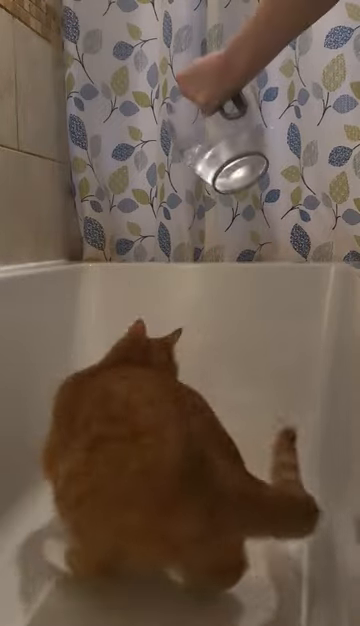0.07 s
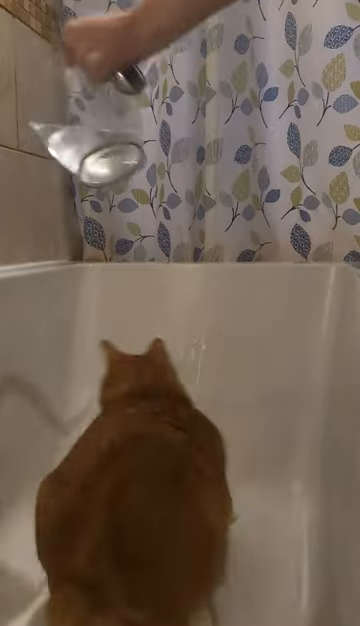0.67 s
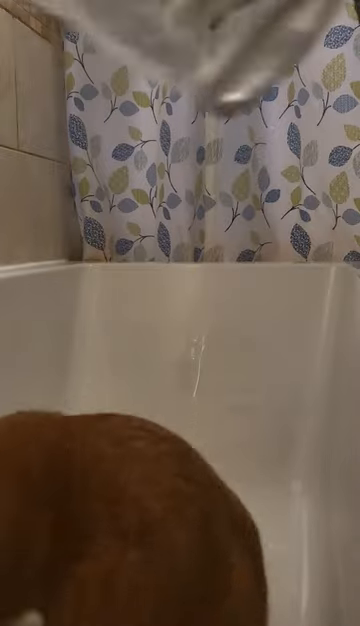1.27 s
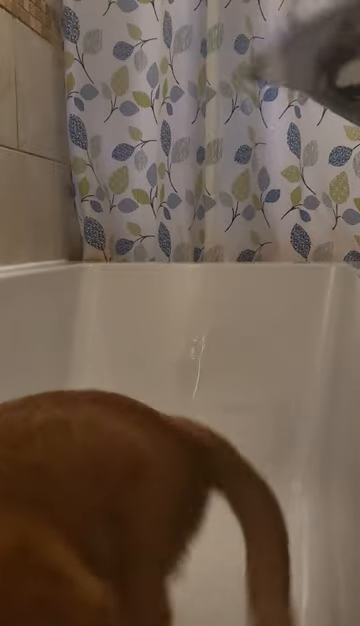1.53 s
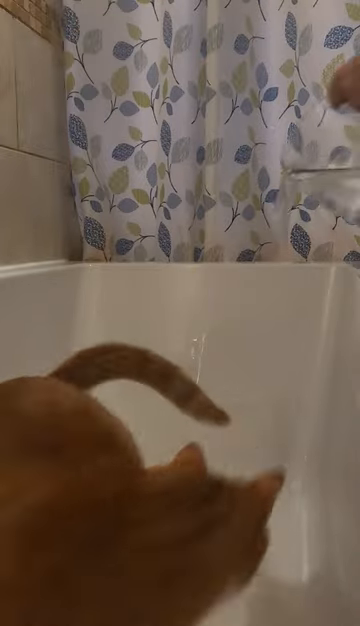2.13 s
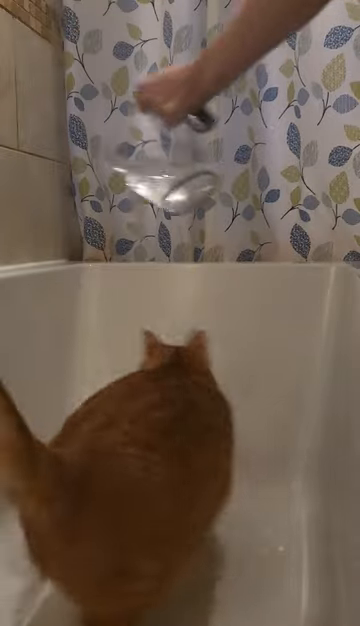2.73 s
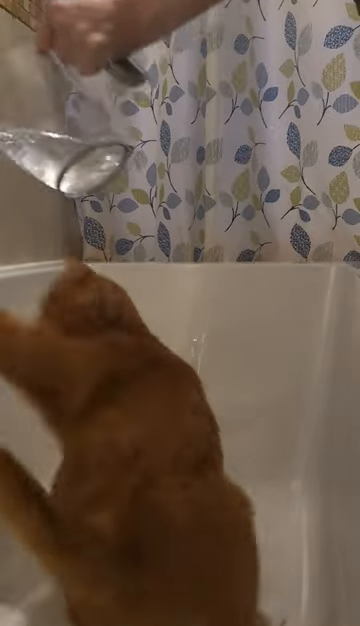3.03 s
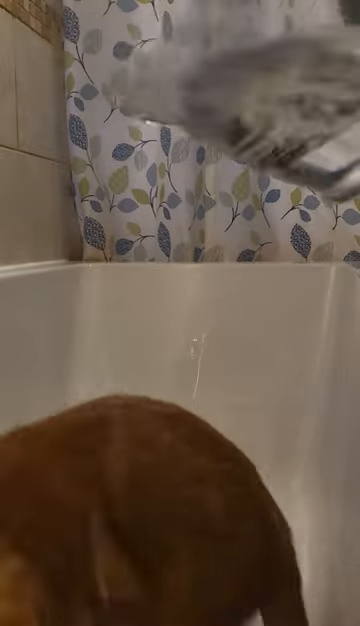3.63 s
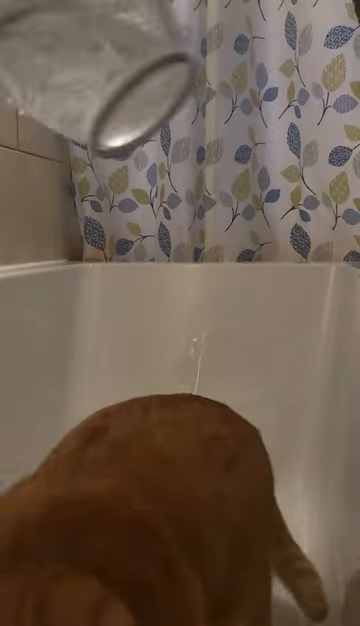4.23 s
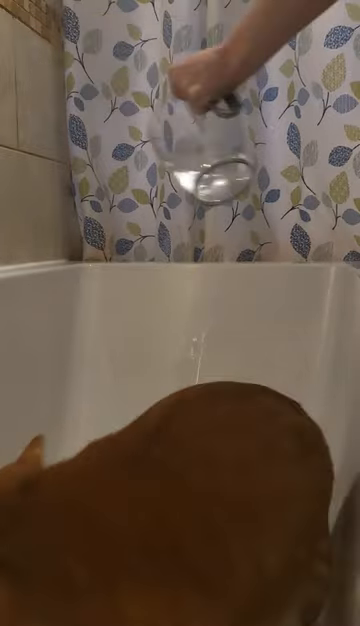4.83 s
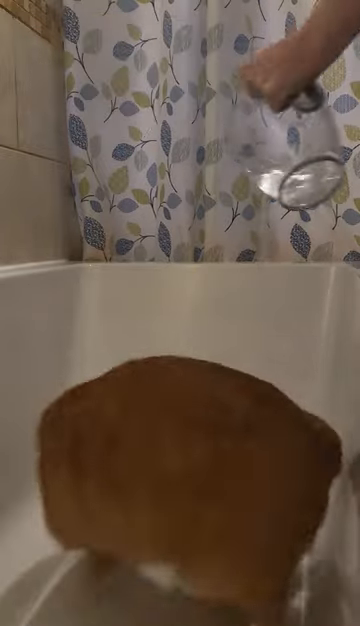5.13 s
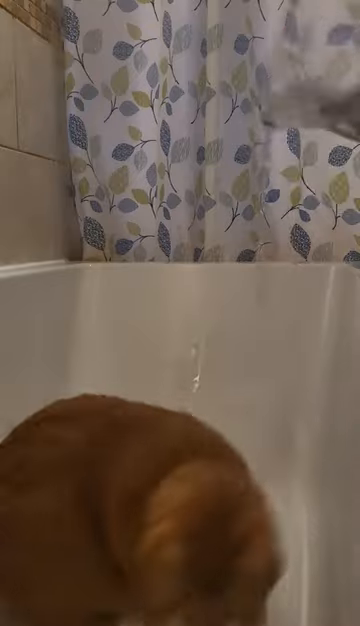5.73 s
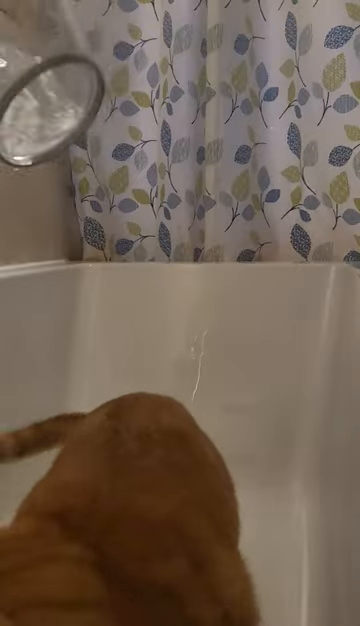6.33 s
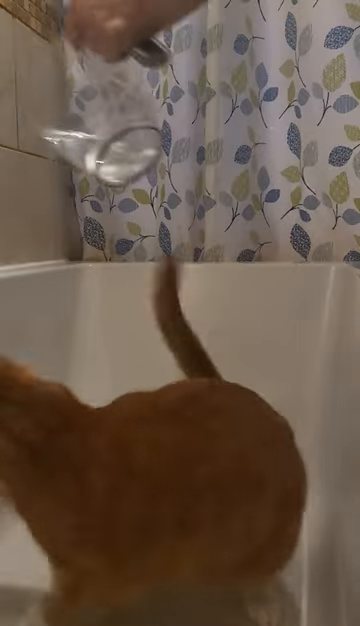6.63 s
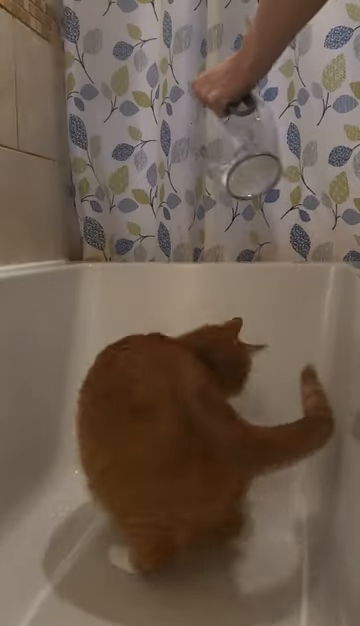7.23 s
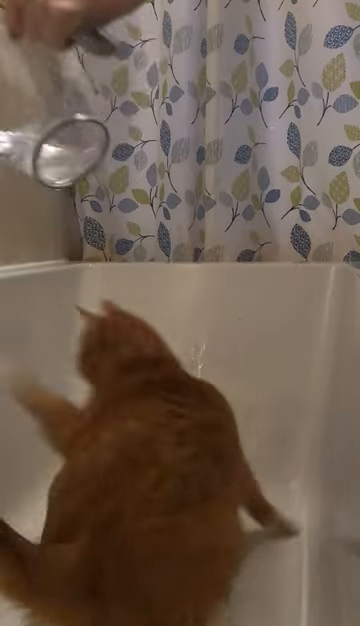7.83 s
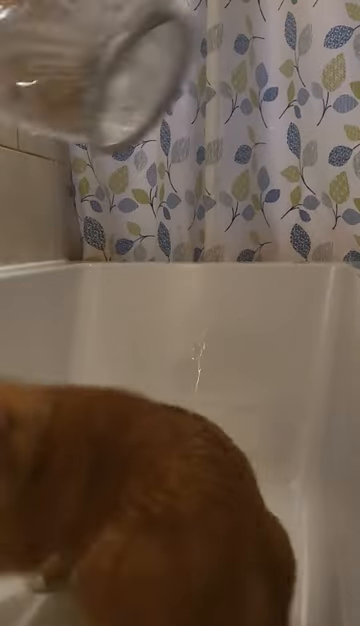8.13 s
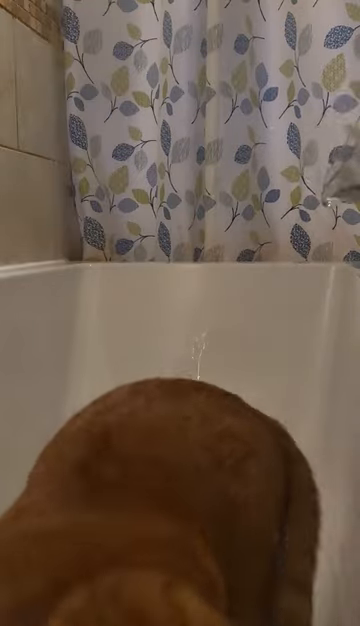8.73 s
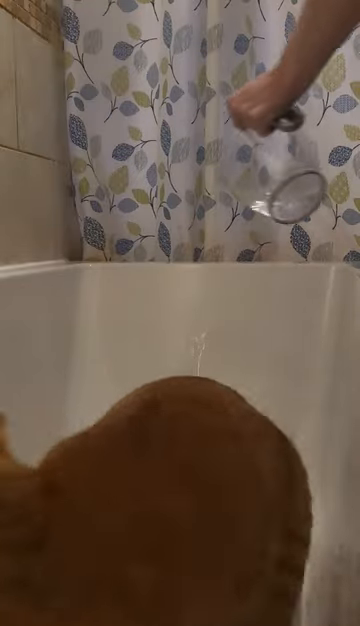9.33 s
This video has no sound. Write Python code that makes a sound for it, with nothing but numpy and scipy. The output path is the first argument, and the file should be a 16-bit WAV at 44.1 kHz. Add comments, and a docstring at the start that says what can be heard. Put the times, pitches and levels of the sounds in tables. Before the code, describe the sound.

A cat's paws thump and slap in a hollow bathtub while water splashes and drips in short bursts.

```python
"""A cat turns about in an empty bathtub and swats at a glass jug that is swung around it.
Its paws slap, thump and shuffle on the hollow tub, which rings and booms; a wet pad squeaks.
As the jug swings, water splashes (many tiny ringing bubbles) and drips (single splats and plinks).
Claws and flung water tick on the enamel, and the small tiled bathroom rings briefly."""
import sys
import numpy as np
from scipy import signal
from scipy.fft import rfft, irfft, next_fast_len
from scipy.io import wavfile
from scipy.ndimage import map_coordinates

SR = 44100
rng = np.random.default_rng(int(sys.argv[2]) if len(sys.argv) > 2 else 0)


def materialize(psi):
    """Save the field psi as 16-bit PCM at rate SR to the path in sys.argv[1].

    A 1-D psi becomes a single channel; in a 2-D psi each row is a channel.
    """
    bounded = np.clip(np.atleast_2d(psi).T, -1, 1)
    quanta = np.round(bounded * 32767).astype(np.int16)
    wavfile.write(sys.argv[1], SR, quanta)


N = 418509
T = np.arange(SR // 2) / SR  # the life of one short sound [s]

# Levels are relative, before later gains. A ring time (t60) is the time taken to fade by 60 dB.
# the tone of the quiet room (frequency [Hz], level [dB])
HUSH_TONE = [(20, -12), (64, -5), (130, -12.5), (300, -20.5), (1000, -34.5), (1600, -39.5), (4000, -46),
             (10000, -40), (16000, -53.5)]
# the rise and fall of a faint hollow noise (time [s], level [dB])
WASH_LEVELS = [(1.7, -82.5), (2.8, -69), (4.3, -80.5), (9, -90.5)]
# the cat shifts its feet (start [s], length [s], rumble level [dB], flexing level [dB])
FOOT_SHIFTS = [(0.01, 0.21, -28, -25.5), (0.633, 0.11, -49.5, -39), (0.765, 0.085, -35, -57.5),
               (0.967, 0.32, -32.5, -32.5), (1.328, 0.29, -36.5, -35.5), (1.804, 0.42, -60, -57.5),
               (2.17, 0.081, -44, -41), (2.355, 0.23, -32.5, -41), (2.478, 0.1, -32, -33),
               (2.685, 0.029, -41.5, -33.5), (2.896, 0.29, -34, -34), (3.34, 0.29, -29, -25),
               (3.711, 0.059, -32.5, -35.5), (4.432, 0.26, -49.5, -59), (4.745, 0.051, -41.5, -63),
               (4.888, 0.11, -31.5, -32), (5.073, 0.099, -35.5, -33.5), (5.341, 0.27, -33.5, -41),
               (5.469, 0.42, -34, -28.5), (5.884, 0.12, -41, -45), (6.084, 0.035, -36, -29.5),
               (6.375, 0.085, -35.5, -39.5), (6.572, 0.15, -38, -34.5), (6.856, 0.24, -29, -31.5),
               (7.24, 0.087, -36.5, -34), (7.669, 0.2, -54.5, -55.5), (7.815, 0.34, -33.5, -50.5),
               (8.092, 0.025, -21, -18), (8.28, 0.23, -35.5, -33.5), (8.636, 0.03, -34.5, -33),
               (9.199, 0.027, -47, -63), (9.298, 0.18, -38.5, -50)]
# the tone of the tub flexing (frequency [Hz], level [dB])
FLEX_TONE = [(22, -40), (40, -32.5), (52, -8.5), (63, 1.5), (76, -8), (100, -15.5), (600, -120)]
# the tone of soft paws on the tub (frequency [Hz], level [dB])
PAW_TONE = [(40, -39), (95, 3), (160, 4.5), (280, -2.5), (400, -7.5), (700, -14), (1100, -22), (8000, -100)]
# the notes at which the tub rings (pitch [Hz], level [dB], ring time [s])
TUB_NOTES = [(98.7, 5, 0.17), (116.6, 2, 0.31), (156.1, 0, 0.36), (189, -7, 0.31), (208.6, -0.5, 0.3),
             (256, -5.5, .26), (278.8, 3, 0.26), (328.4, -16.5, 1), (357.4, -3, 0.29), (394.3, -2.5, 0.09),
             (450, -2, 0.24), (518, -3, 0.18), (638, -6, 0.18), (857, -7.5, 0.4), (943, -9, 0.16),
             (1190, -15, 0.13)]
# water is thrown about (start [s], length [s], spray level [dB], slosh level [dB])
WATER_THROWS = [(.01, 0.099, -48.5, -46.5), (0.194, 0.055, -68, -59), (0.697, .04, -64, -87),
                (0.762, 0.081, -56.5, -54), (0.983, 0.05, -60, -52), (1.13, 0.049, -54.5, -47),
                (1.254, 0.14, -46, -48), (1.404, .17, -58.5, -53.5), (1.998, 0.28, -67.5, -75),
                (2.345, 0.074, -53.5, -54), (2.406, .04, -44, -49), (2.473, 0.037, -57.5, -50.5),
                (2.542, 0.21, -68, -73.5), (2.962, .16, -56, -53), (3.221, 0.07, -59.5, -64.5),
                (3.329, 0.026, -56, -45.5), (3.479, 0.17, -47, -52), (3.538, 0.019, -43, -39),
                (3.661, 0.13, -50, -52), (3.828, 0.044, -63, -70.5), (4.47, 0.15, -59.5, -66),
                (4.854, 0.07, -57, -56.5), (5.03, 0.25, -66, -69), (5.383, 0.066, -59, -57.5),
                (5.452, 0.04, -43, -41.5), (5.56, 0.15, -54, -48.5), (5.83, 0.085, -63, -58.5),
                (5.937, 0.012, -48, -48.5), (6.051, .1, -67.5, -59), (6.376, 0.13, -63.5, -58),
                (6.571, 0.18, -59, -54.5), (6.872, 0.11, -49.5, -46), (7.207, 0.08, -60, -53.5),
                (7.77, 0.022, -61, -62.5), (7.823, 0.077, -64.5, -58.5), (7.958, 0.24, -68.5, -55.5),
                (8.222, 0.059, -55.5, -55), (8.307, 0.04, -48, -45.5), (8.433, 0.08, -47.5, -47),
                (8.574, 0.023, -50.5, -51), (9.258, 0.14, -58, -60)]
# the tone of fine spray (frequency [Hz], level [dB])
SPRAY_TONE = [(1500, -39.5), (4000, -10.5), (6500, -2), (8000, -2), (10000, 6.5), (13000, 4.5),
              (16000, 3.5)]
# the tone of coarse sloshing (frequency [Hz], level [dB])
SLOSH_TONE = [(200, 9), (800, 5.5), (1300, 0.5), (2200, -2.5), (4200, -4.5), (12000, -35.5)]
# paws land on the tub floor (time [s], level [dB], centre pitch [Hz])
PAW_LANDINGS = [(.014, -20.5, 205), (0.052, -24, 265), (0.125, -17, 161), (0.156, -26, 277),
                (0.623, -42, 208), (0.794, -30, 217), (0.91, -11, 162), (1.102, -10.5, 264),
                (1.341, -32.5, 347), (2.181, -28, 136), (2.412, -28.5, 278), (2.491, -22.5, 170),
                (2.893, -41.5, 261), (2.962, -32.5, 177), (3.096, -12, 217), (3.297, -16.5, 266.4),
                (3.376, -15, 150), (3.549, -17, 152), (4.456, -40, 166), (4.867, -24.5, 282),
                (4.927, -25, 197.7), (5.533, -14.5, 169), (5.584, -19, 250), (5.674, -18.5, 210),
                (5.722, -10, 124), (5.738, -9.5, 205), (6.075, -29, 202), (6.379, -36.5, 206),
                (6.592, -37, 257), (6.648, -17.5, 390), (6.688, -11.5, 163), (6.87, -24, 345),
                (7.032, -9, 231), (7.041, -12, 108.8), (7.941, -14, 263), (8.098, -9, 197.7),
                (8.108, -6.5, 110.8), (8.648, -32, 146)]
# claws and flung water hit the enamel (time [s], level [dB])
ENAMEL_TICKS = [(.0503, -29), (0.1164, -34), (.1396, -32), (.2503, -46.5), (0.8344, -41), (1.0026, -39.5),
                (1.0783, -39), (1.6681, -48.5), (2.18, -39.5), (2.374, -37), (2.6923, -41.5), (3.046, -28),
                (3.3598, -26.5), (3.448, -36), (3.5052, -28), (4.4652, -45.5), (4.864, -29), (5.466, -27),
                (5.681, -23.5), (5.8417, -47), (6.4692, -45), (7.2667, -35), (7.441, -47.5), (8.3229, -28),
                (9.2843, -44), (9.392, -40)]
# the cat's weight flexes the whole tub (time [s], level [dB], pitch [Hz])
TUB_BOOMS = [(0.099, -38, 62.9), (0.992, -24, 63.1), (1.087, -25, 66.4), (3.362, -13, 66.7),
             (3.512, -23.5, 65.2), (5.709, -19.5, 62.6), (6.667, -19.5, 62.2), (7.044, -11.5, 62.8),
             (7.936, -29.5, 66.4), (8.079, -17, 57.7)]
# single drops land (time [s], level [dB], pitch [Hz], clearness of the ring [Q])
WATER_DROPS = [(0.416, -43, 6170, 1.9), (1.5319, -37.5, 7340, 6), (1.5785, -43.5, 2910, 7.8),
               (2.364, -31.5, 3650, 4.3), (2.3966, -28, 7650, 2.6), (2.451, -32.5, 4000, 5.4),
               (3.5682, -26, 6790, 2.8), (3.6334, -41, 2760, 8.1), (3.699, -32.5, 3320, 2.4),
               (3.7505, -30.5, 4700, 2.2), (3.7918, -41, 4000, 4.8), (3.8762, -36.5, 5600, 1.6),
               (4.213, -69, 3400, 10), (4.504, -39, 8550, 3.6), (4.5561, -37, 9330, 2.5),
               (4.615, -30, 3510, 2.3), (4.814, -42.5, 4180, 4), (5.146, -37.5, 2330, 3),
               (5.152, -30, 4400, 2), (5.4437, -35.5, 7000, 3), (5.515, -27.5, 3790, 3.1),
               (5.588, -24.5, 6700, 1.3), (5.9234, -40, 6250, 3.3), (5.9715, -27.5, 7040, 2.9),
               (6.068, -38.5, 4100, 1.6), (6.6822, -24, 3430, 1.4), (6.882, -28, 7050, 2.8),
               (6.9069, -22, 2490, 4.3), (6.919, -27.5, 3560, 3.4), (6.978, -32, 2946, 2),
               (7.0325, -25, 4310, 3), (7.037, -23, 6880, 2.7), (7.8485, -33.5, 10600, 2.4),
               (8.2411, -39.5, 10290, 4.4), (8.2711, -34.5, 6500, 3), (8.49, -33.5, 2140, 2),
               (8.5876, -28, 6400, 3.5), (8.5994, -32, 3460, 2.3)]
# sharp paw slaps (time [s], knock level [dB], crack level [dB], snap level [dB], panel pitch [Hz])
PAW_SLAPS = [(0.9, -11, -27, -34.5, 1206), (1.098, -11, -34, -43, 912), (1.333, -15, -35, -47, 1137),
             (2.961, -34, -64, -59, 480), (3.098, -34, -47, -50, 460), (3.288, -22, -46.5, -54, 634),
             (3.304, -19, -41, -51.5, 910), (3.535, -20.5, -46, -50.5, 840), (4.858, -35, -75, -59.5, 507),
             (5.531, -18, -40.5, -47, 705), (5.708, -18, -33, -44, 1140), (6.647, -18.5, -57.5, -64, 875),
             (6.866, -24.5, -51, -59.5, 636), (7.033, -29.5, -42.5, -46, 495),
             (7.935, -14, -42, -49.5, 448), (8.093, -8, -36, -45, 875), (8.64, -33, -44, -57.5, 630),
             (8.7, -36, -44.5, -54.5, 1503)]
# the tone of a slap's low knock (frequency [Hz], level [dB])
KNOCK_TONE = [(100, -32), (400, 2), (650, 4.5), (900, 2), (1200, 0.5), (1600, -8), (2600, -30), (8000, -80)]
# the tone of a slap's bright crack (frequency [Hz], level [dB])
CRACK_TONE = [(500, -40), (1500, 5), (2100, 4), (3300, -2.5), (5000, -8.5), (12000, -44)]
# the tone of a slap's very high snap (frequency [Hz], level [dB])
SNAP_TONE = [(1500, -44), (5000, -1), (9000, 1), (16000, -3)]
# a wet pad sticks and slips (time [s], level [dB])
PAD_SLIPS = [(5.34, -55), (5.361, -47), (5.381, -44.5), (5.405, -51), (5.41, -47.5), (5.434, -44),
             (6.1, -54), (6.123, -60), (7.29, -45.5), (7.325, -52.5)]
# the strength of a squeak's overtones (frequency [Hz], level [dB])
SQUEAK_TONE = [(450, -15.5), (1400, -2.5), (3200, -13), (4500, -15.5)]
# how long the bathroom rings (frequency [Hz], ring time [s])
ROOM_RING = [(100, 0.14), (260, 0.5), (700, 0.18), (1800, 0.21), (5000, 0.23), (13000, 0.11)]
# how alike the room sounds on the left and right (frequency [Hz], likeness [0 to 1])
SIDE_LIKENESS = [(60, 0.9), (125, 0.25), (250, 0.95), (600, 0.96), (1200, 0.093), (2500, 0.05),
                 (6000, 0.0048)]
# how much louder the left side is than the right (frequency [Hz], level [dB])
LEFT_BOOST = [(60, 3), (125, 4), (300, 1.5), (1000, 1.5), (2000, 3.5), (4000, 6.5), (12000, 7.5)]


def amp(db):
    """Turn decibels into a gain."""
    return 10 ** (np.asarray(db) / 20)


def unit(x):
    """Scale a sound to an average (rms) level of 1."""
    return x / np.sqrt(np.mean(x ** 2) + 1e-20)


def head_unit(x):
    """Scale a blow so that its first 30 ms have an average (rms) level of 1."""
    return x / np.sqrt(np.mean(x[..., :1323] ** 2) + 1e-20)


def along(points, hz):
    """Read between the rows of a (frequency, value) table, on a log scale."""
    freqs, values = np.transpose(points)
    return np.interp(np.log(hz + 1), np.log(freqs + 1), values)


def filtered(x, response):
    """Give each frequency in x the gain that response returns for it."""
    n = x.shape[-1]
    padded = next_fast_len(n + 8192)
    return irfft(rfft(x, padded) * response(np.fft.rfftfreq(padded, 1 / SR)), padded)[..., :n]


def coloured(x, tone):
    """Shape a sound with a tone table."""
    return filtered(x, lambda hz: amp(along(tone, hz)))


def resonance(hz, centre, q):
    """A filter that rings at one pitch; a higher q rings longer and clearer."""
    return 1j * hz * centre / q / (centre ** 2 - hz ** 2 + 1j * hz * centre / q)


def wobble(rate):
    """A smooth curve through rate random points a second."""
    return map_coordinates(rng.standard_normal(N // 100), [np.arange(N) * rate / SR])


def fade(t60, t=T):
    """Die away by 60 dB every t60 seconds."""
    return np.exp(-np.log(1000) * t / t60)


def onset(attack_s):
    """Rise smoothly from 0 towards 1."""
    return 1 - np.exp(-T / attack_s)


def surges(start, length, db, rise, sag, fall):
    """The gain of overlapping events: each rises, sags, then dies away (slopes in dB per second)."""
    grid = np.arange(0, N, 64)
    age = grid[:, None] / SR - start
    loss_db = rise * np.maximum(0.01 - age, 0) + sag * np.maximum(age, 0)
    loss_db += fall * np.maximum(age - length, 0)
    return np.interp(np.arange(N), grid, np.linalg.norm(amp(db - loss_db), axis=1))


def add(track, s, x):
    """Mix a short stereo sound into the track at s seconds."""
    part = track[:, max(round(s * SR), 0):][:, :x.shape[1]]
    part += x[:, :part.shape[1]]


def diffuse(pair):
    """Blend two noises to surround the listener: mostly alike in the bass, unrelated in the treble."""
    turn = lambda hz: np.arccos(np.clip(along(SIDE_LIKENESS, hz), -1, 1)) / 2
    mid, side = filtered(pair, lambda hz: np.array([np.cos(turn(hz)), np.sin(turn(hz))]))
    return np.array([mid + side, mid - side])


def direct(x):
    """The straight path to the listener; the right side lags by 0 to 7 samples, at random."""
    return np.array([x, np.pad(x, (rng.integers(8), 0))[:len(x)]])


def tiles():
    """Echoes off the tiles blur into a short tail of noise, new each time."""
    hz, t, spectrum = signal.stft(rng.standard_normal((2, len(T))), SR, nperseg=256)
    spectrum *= fade(along(ROOM_RING, hz)[:, None], t)
    tail = signal.istft(spectrum, SR, nperseg=256)[1][:, :len(T)]
    tail = diffuse(tail * onset(0.0035))
    return tail / np.linalg.norm(tail[0])


def bathroom(x, echo_db):
    """A mono sound arrives directly and by way of the tiles."""
    return signal.fftconvolve(x[None], direct(T == 0) + amp(echo_db) * tiles(), axes=1)


def moving(x, echo_db):
    """A sound travels through the room, so each stretch gets its own echoes."""
    out = np.zeros((2, N))
    for part in np.array_split(np.arange(N), 24):
        add(out, part[0] / SR, bathroom(x[part], echo_db))
    return out / np.hypot(1, amp(echo_db))


def contact(t60, attack_s, echo_db):
    """Tiny collisions make a burst of noise, and the tiles answer."""
    burst = rng.standard_normal(len(T)) * fade(t60) * onset(attack_s)
    return direct(burst / np.linalg.norm(burst)) + amp(echo_db) * tiles() * onset(attack_s)


def tub_shell(hz, depth):
    """The tub boosts sound near its own notes."""
    notes = (amp(db) / (1 + 1j * (hz - f) * t60 * np.pi / np.log(1000)) for f, db, t60 in TUB_NOTES)
    return 1 + depth * sum(notes)


def hush(level_db=-68):
    """The quiet room: a steady, low noise."""
    return amp(level_db) * unit(coloured(diffuse(rng.standard_normal((2, N))), HUSH_TONE))


def wash(pitch_hz=800):
    """A faint hollow noise swells and fades behind everything."""
    noise = diffuse(rng.standard_normal((2, N)))
    hollow = filtered(noise, lambda hz: resonance(hz, pitch_hz, q=1.7) ** 3)
    level_db = np.interp(np.arange(N) / SR, *np.transpose(WASH_LEVELS))
    return amp(level_db) * unit(hollow)


def shuffle():
    """Shifting feet make the shell rumble in uneven bumps; the same weight flexes the tub deeply."""
    start, length, rumble_db, flex_db = np.transpose(FOOT_SHIFTS)
    flex_gain = surges(start, length, flex_db, rise=451.5, sag=4.5, fall=85.5)
    rumble_gain = surges(start, length, rumble_db, rise=800.5, sag=4.5, fall=121.5)
    flex = unit(coloured(diffuse(rng.standard_normal((2, N))), FLEX_TONE))
    bumps = amp(3 * wobble(44))
    tread = coloured(diffuse(bumps * rng.standard_normal((2, N))), PAW_TONE)
    rumble = unit(filtered(tread, lambda hz: tub_shell(hz, depth=3)))
    return amp(-1) * flex_gain * flex + amp(-2) * rumble_gain * rumble


def bubbles(per_s, hz, octaves, cycles, scatter_db, size=256):
    """Tiny bubbles each ring for a few cycles, at a random time, pitch and strength."""
    when, how_high, how_loud = rng.random((int(per_s * N / SR), 3)).T[:, :, None]
    t = T[:size]
    start = (when * N).astype(int)
    pitch = np.minimum(hz * 2 ** (octaves * (2 * how_high - 1)), SR / 2)
    strength = amp(scatter_db * np.minimum(-np.log(1 - how_loud), 4))
    rings = strength * np.sin(2 * np.pi * pitch * t) * fade(cycles / pitch, t) * np.sqrt(pitch)
    rings *= 1 - np.exp(-pitch * t / 2)  # each swells over two cycles
    positions = start + np.arange(size)
    return unit(np.bincount(positions.ravel(), rings.ravel(), N + size)[:N])


def splashes():
    """Each splash throws clumps of fine spray and ringing droplets over coarser sloshing."""
    start, length, spray_db, slosh_db = np.transpose(WATER_THROWS)
    slopes = dict(rise=741.5, sag=10, fall=204.5)
    spray_gain = surges(start, length, spray_db, **slopes)
    slosh_gain = surges(start, length, slosh_db + 0.5, **slopes)
    clumps = amp(4 * wobble(130))
    fine = bubbles(per_s=2200, hz=8550, octaves=0.94, cycles=6, scatter_db=5)
    patter = amp(-3) * bubbles(per_s=130, hz=8000, octaves=0.8, cycles=9, scatter_db=3.8)
    coarse = bubbles(per_s=900, hz=2010, octaves=1.8, cycles=4.5, scatter_db=6)
    spray = spray_gain * unit(coloured(clumps * fine, SPRAY_TONE))
    slosh = slosh_gain * unit(coloured(coarse, SLOSH_TONE))
    # the pattering droplets land closer to the listener, so they have less echo
    return moving(spray + slosh, echo_db=-1) + moving(spray_gain * patter, echo_db=-5)


def paw_thumps(gain_db=-8.5, sing_db=6, puff_db=-19):
    """A soft paw rings the tub's notes around one pitch; a harder blow reaches higher notes."""
    out = np.zeros((2, N))
    hz, note_db, t60 = np.transpose(TUB_NOTES)
    notes = fade(t60[:, None]) * np.exp(2j * np.pi * hz[:, None] * T)
    for s, db, centre in PAW_LANDINGS:
        octaves_away = np.abs(np.log2(hz / centre))
        nearest = octaves_away == octaves_away.min()  # this note sings out
        reach = 0.55 * np.where(hz > centre, 2 ** ((db + 25.5) / 34), 1)
        weight = amp(note_db + sing_db * nearest + rng.normal(0, 2, len(hz)))
        weight *= np.exp(-(octaves_away / reach) ** 2 / 2)
        # standing waves reach left and right slightly out of step
        phase = rng.random(len(hz)) + 0.068 * rng.standard_normal((2, len(hz)))
        ring = ((weight * np.exp(2j * np.pi * phase)) @ notes).imag
        puff = coloured(diffuse(rng.standard_normal((2, len(T)))), PAW_TONE) * fade(0.1)
        blow = (head_unit(ring) + amp(puff_db) * head_unit(puff)) * onset(0.0013)
        add(out, s, amp(db + gain_db) * head_unit(blow))
    return out


def ticks(centre_hz=7000):
    """Claws and flung water hit the hard enamel with a crisp, toneless tick."""
    out = np.zeros((2, N))
    for s, db in ENAMEL_TICKS:
        hit = contact(t60=0.009, attack_s=0.0009, echo_db=0)
        tick = filtered(hit, lambda hz: resonance(hz, centre_hz, q=0.49) ** 2)
        add(out, s, amp(db) * tick / np.abs(tick).max())
    return out


def booms(gain_db=2, swell_s=0.043):
    """Under the cat's weight the tub's lowest note swells, then lingers in the room."""
    out = np.zeros((2, N))
    push = (T / swell_s * np.exp(1 - T / swell_s)) ** 2
    linger = amp(-15) * fade(1.0) * onset(swell_s)
    for s, db, hz in TUB_BOOMS:
        boom = amp(db + gain_db) * (push + linger) * np.sin(2 * np.pi * hz * T)
        add(out, s, np.tile(boom, (2, 1)))
    return out


def drops():
    """A drop splats and rings the air that it traps; the clearer the ring, the fainter the tick."""
    out = np.zeros((2, N))
    splat = lambda: contact(t60=0.012, attack_s=0.001, echo_db=-4)
    for s, db, pitch, q in WATER_DROPS:
        pocket = filtered(splat(), lambda hz: resonance(hz, pitch, q) ** 2)
        # the tick loses its bass and its highest treble
        tick_tone = lambda hz: (1j * hz / (2000 + 1j * hz)) ** 3 / (1 + 1j * hz / (2 * pitch))
        tick = filtered(splat(), tick_tone)
        drop = unit(pocket) + amp(3) / q * unit(tick)
        add(out, s, amp(db) * drop / np.abs(drop).max())
    return out


def paw_slaps(attack_s=0.0007, echo_db=-2):
    """A swat knocks the tub and rings the panel it hits, with a crack and a snap on top."""
    out = np.zeros((2, N))
    burst = lambda tone, t60: coloured(contact(t60, attack_s, echo_db), tone)
    for s, knock_db, crack_db, snap_db, pitch in PAW_SLAPS:
        body = lambda hz: tub_shell(hz, depth=0.86) * (1 + 1.6 * resonance(hz, pitch, q=8))
        knock = filtered(burst(KNOCK_TONE, t60=0.024), body)
        panel = np.sin(2 * np.pi * pitch * T) + np.sin(2 * np.pi * pitch * np.sqrt(3) * T) / 2
        clack = direct(panel * fade(0.055) * onset(attack_s))  # the panel's first brief swing
        add(out, s, amp(knock_db - 10) * head_unit(knock))
        add(out, s, amp(knock_db - 15) * head_unit(clack))
        add(out, s, amp(crack_db + 1) * head_unit(burst(CRACK_TONE, t60=0.03)))
        add(out, s, amp(snap_db) * head_unit(burst(SNAP_TONE, t60=0.0033)))
    return out


def pad_skid(gain_db=-2, pitch_hz=445, slip_s=0.016):
    """A wet pad stutters across the tub floor; every slip is a short, rough squeak."""
    out = np.zeros((2, N))
    orders = np.arange(1, 9)[:, None]
    strengths = amp(along(SQUEAK_TONE, orders * pitch_hz))
    stroke = np.sin(np.pi * np.minimum(T / slip_s, 1))
    for s, db in PAD_SLIPS:
        wavering_hz = pitch_hz * (1 + 0.13 * wobble(410)[:len(T)])
        cycles = np.cumsum(wavering_hz) / SR
        overtones = strengths * np.sin(2 * np.pi * (orders * cycles + rng.random(orders.shape)))
        squeak = unit(overtones.sum(0)) * stroke
        add(out, s, amp(db + gain_db) * bathroom(squeak, echo_db=-2))
    return out


def tap(time_s=5.889, level_db=-17, pitch_hz=620):
    """One small tap close to the listener, with no echo."""
    out = np.zeros((2, N))
    blip = amp(level_db) * np.sin(2 * np.pi * pitch_hz * T) * fade(0.0038)
    add(out, time_s, np.tile(blip, (2, 1)))
    return out


def scene():
    """Cat, tub and water in the bathroom."""
    cat = paw_slaps() + paw_thumps() + booms() + shuffle() + pad_skid()
    return cat + tap() + drops() + ticks() + splashes() + wash() + hush()


def record(dry, lead_s=0.00025, top_hz=15950):
    """The left side is louder and a little earlier; peaks are rounded and the top treble is cut."""
    sides = np.array([[1], [-1]]) / 2
    balance = lambda hz: amp(sides * along(LEFT_BOOST, hz))
    stereo = filtered(dry, lambda hz: balance(hz) * np.exp(2j * np.pi * hz * lead_s * sides))
    rounded = stereo / (1 + np.abs(stereo) ** 6) ** (1 / 6)
    return filtered(rounded, lambda hz: hz < top_hz)


dry = scene()
out = record(dry)
materialize(out)
```